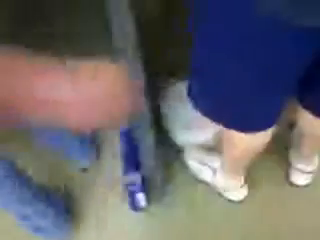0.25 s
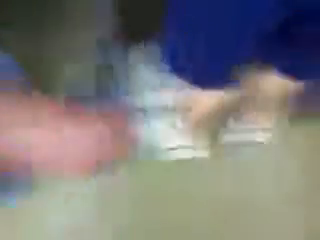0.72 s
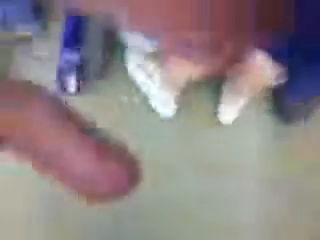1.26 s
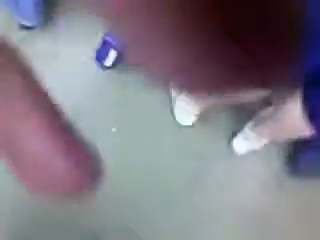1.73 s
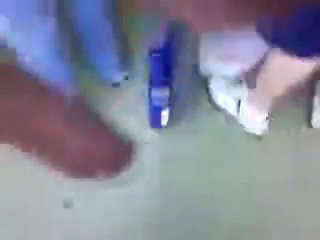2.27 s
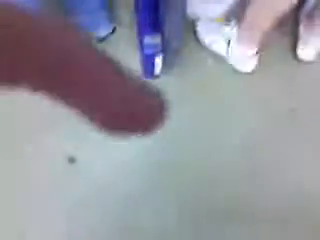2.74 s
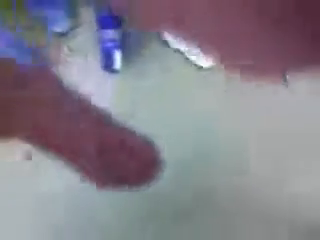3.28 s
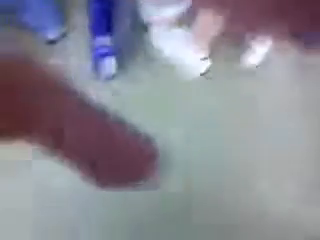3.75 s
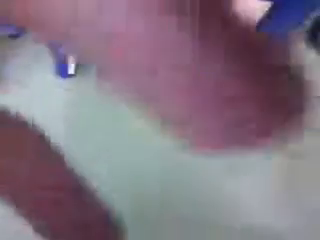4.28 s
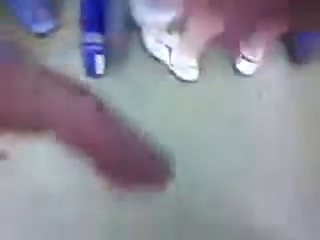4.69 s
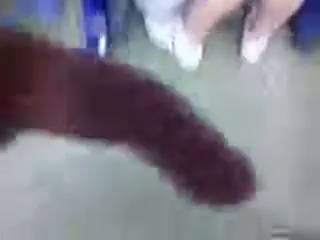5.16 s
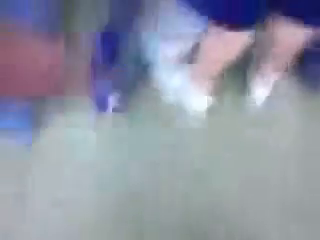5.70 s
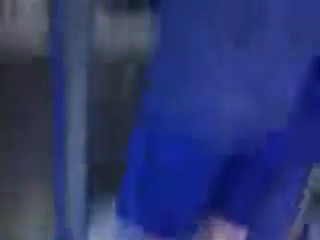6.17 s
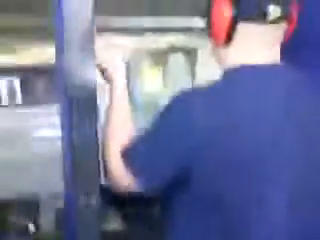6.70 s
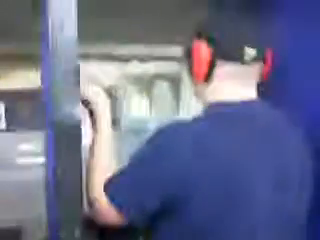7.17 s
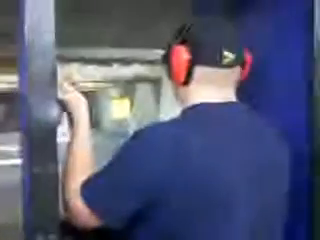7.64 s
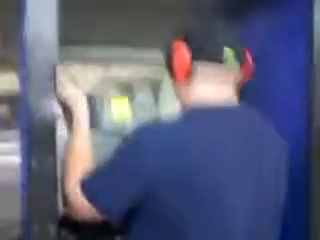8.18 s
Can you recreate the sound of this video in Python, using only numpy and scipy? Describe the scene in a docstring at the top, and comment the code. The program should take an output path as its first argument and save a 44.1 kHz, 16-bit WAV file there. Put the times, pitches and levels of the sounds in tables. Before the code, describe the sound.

Overdriven handgun shots roar and echo between concrete walls, with small metal clicks, a tinkling cartridge case and soft rustling in the gaps.

```python
"""An indoor range, just behind the firing line: five pistol shots through a hand-held stereo recorder.
Each shot is a pressure pulse, a noise burst and a hall echo whose treble dies first; saturation makes it a harsh roar
until the echo has died down enough to come through clean. Between shots: decaying noise for clicks and knocks of
gun handling, a decaying sine for a ringing cartridge case, thin squeaks, shaped noise for rustle near the recorder
and for ventilation, and wavering sines for fan hum."""
import sys
import numpy as np
from scipy import signal
from scipy.fft import rfft, irfft, next_fast_len
from scipy.io import wavfile
from scipy.ndimage import uniform_filter1d

SR = 44100
rng = np.random.default_rng(int(sys.argv[2]) if len(sys.argv) > 2 else 0)


def persist_wave(psi):
    """Save psi, clipped to +-1, as 16-bit WAV."""
    counts = np.round(np.clip(psi, -1, 1) * 32767).astype(np.int16)
    wavfile.write(sys.argv[1], SR, np.atleast_2d(counts).T)


N = 371763
TIME = np.arange(N) / SR
PORT_DELAY = 1 / 2610  # travel time between the microphones, s


def gain_of(db):
    """Level to amplitude: 20 dB is a factor of ten."""
    return 10 ** (np.asarray(db) / 20)


def read(points, hz):
    """Interpolates a table along a logarithmic frequency axis."""
    f, value = np.transpose(points)
    return np.interp(np.log(hz + 1), np.log(f + 1), value)


def add(mix, s, sound):
    """Superposition: adds a two-channel sound to the mix from time s."""
    part = mix[:, round(s * SR):][:, :sound.shape[1]]
    part += sound[:, :part.shape[1]]


def wander(size, rate_hz):
    """Low-passed noise: smooth random motion of standard deviation 1."""
    hz = np.fft.rfftfreq(size, 1 / SR)
    x = irfft(rfft(rng.standard_normal(size)) / (1 + (hz / rate_hz) ** 4), size)
    return x / x.std()


def swell(top_s, rise_s, fall_s):
    """Squared-cosine envelope: a smooth rise from 0 to 1 and back."""
    u = (TIME - top_s) / np.where(TIME < top_s, rise_s, fall_s)
    return np.cos(np.pi / 2 * np.clip(u, -1, 1)) ** 2


def diffuse(spectrum, size, tilt_db=0, likeness=0.99):
    """Diffuse-field coherence: two microphones agree in the bass, not at wavelengths below their spacing."""
    padded = next_fast_len(size)
    hz = np.fft.rfftfreq(padded, 1 / SR)
    a, b = rfft(rng.standard_normal((2, padded)))
    same = likeness * np.sinc(2 * hz * PORT_DELAY)
    common = a * np.sqrt((1 + same) / 2)
    apart = b * np.sqrt((1 - same) / 2)
    # tilt_db is per octave, pivoting near 1 kHz
    colour = gain_of(read(spectrum, hz) + tilt_db * np.log2((hz + 20) / 1000))
    pair = np.array([common + apart, common - apart]) * colour
    return irfft(pair, padded)[:, :size] * np.sqrt(SR / 2)  # noise density per Hz to amplitude


def burst(spectrum, db, t60, tilt_db=0):
    """Exponential decay: a sudden cloud of reflections that loses 60 dB in t60 seconds."""
    return diffuse(spectrum, SR, tilt_db) * gain_of(db - 60 * TIME[:SR] / t60)


def shots(clump_db=0.5, clump_hz=45, mode_spread=0.095):
    """Impulsive source in a room: pressure front, bright blast, then reverberation arriving in clumps."""
    # one row a shot: t/s, hall echo level/dB, blast level/dB, blast t60/s, brightness/(dB per octave),
    # factor on the hall's decay time
    shot_rows = [(0.1160, 3.5, 10, 0.4, -0.11, 1.058), (2.0672, -1, 1, 0.37, -0.25, 1),
                 (4.818, 0, 1.5, 0.36, -0.06, 1.01), (5.2650, 4.5, 13.5, 0.33, 0.03, 0.95),
                 (6.8850, -1.5, 0, 0.37, 0.22, 1.044)]
    # first reflections from booth, floor and ceiling, at a blast level of 0 dB: f/Hz, level/(dB per Hz)
    blast_spectrum = [(40, -62.5), (120, -38.5), (350, -29), (1000, -29.5), (2000, -19), (4000, -25.5),
                      (7000, -23.5), (10000, -26), (14000, -25.5)]
    out = np.zeros((2, N))
    # some of the hall's modes outlast their neighbours, the same ones after every shot
    lasting = np.exp(mode_spread * uniform_filter1d(rng.standard_normal(1025), size=2))
    for s, hall_db, blast_db, blast_t60, tilt_db, stretch in shot_rows:
        blast = burst(blast_spectrum, blast_db, blast_t60, tilt_db)
        add(out, s, gain_of(blast_db) * front() + blast)
        add(out, s, hall(hall_db, tilt_db, stretch * lasting))
    return out * gain_of(clump_db * wander(N, clump_hz))


def front(peak_db=21, push_s=.0014):
    """Zero net impulse: a push, then a longer suck, throws the two overdriven microphones opposite ways."""
    # peak_db holds at a blast level of 0 dB
    u = TIME[:SR] / push_s
    return gain_of(peak_db) * (1 - u) * np.exp(-u) * np.array([[-1], [1]])


def hall(db, tilt_db, stretch, size=3 * SR):
    """Frequency-dependent reverberation: the long echo between concrete walls loses its treble first."""
    # the echo at the shot, for an echo level of 0 dB: f/Hz, level/(dB per Hz)
    hall_spectrum = [(40, -69), (110, -50.5), (170, -49), (250, -38.5), (350, -32.5), (500, -35),
                     (750, -37), (1000, -38), (1500, -36), (2200, -32.5), (3500, -36), (7000, -45),
                     (13000, -38.5)]
    # decay time before the stretch factor: f/Hz, t60/s
    hall_decay = [(100, 1.8), (350, 1.618), (1000, 1.379), (2000, 0.97), (3500, 0.77), (7000, 0.76),
                  (13000, 0.33)]
    hz, t, z = signal.stft(diffuse(hall_spectrum, size, tilt_db), SR, nperseg=2048)
    t60 = stretch * read(hall_decay, hz)
    fade = gain_of(db - 60 * t / t60[:, None])
    return signal.istft(z * fade, SR, nperseg=2048)[1][:, :size]


def handling(snap_db=5, snap_t60=0.015):
    """Impact noise: each click or knock is a short snap over a decaying cloud of reflections."""
    # small metal clicks of guns and cases: t/s, level/dB over the spectrum, t60/s, brightness/(dB per octave)
    click_rows = [(.4875, 37, .03, -4), (.5335, 20.5, .03, -1.5), (1.0387, -2.5, 0.28, 1.5),
                  (1.0916, 1, 0.29, .5), (1.1978, 3.5, 0.27, -2), (1.5136, -6, 0.21, -3.5),
                  (2.7951, -1, 0.28, -1), (3.3488, -10, .13, -1.5), (3.4271, 3.5, .02, -2),
                  (3.4338, 3, .07, 0)]
    # click spectrum: f/Hz, level/(dB per Hz)
    click_spectrum = [(40, -140), (300, -107), (1500, -83), (4000, -84.5), (8000, -83), (14000, -89.5)]
    # dull knocks at the bench: t/s, level/dB over the spectrum, t60/s, brightness/(dB per octave)
    knock_rows = [(4.7475, -4, 0.46, 3), (6.7323, -2.5, 0.051, -5.2)]
    # knock spectrum: f/Hz, level/(dB per Hz)
    knock_spectrum = [(100, -84), (500, -85), (1600, -69), (3500, -73), (7000, -95.5), (14000, -101)]
    out = np.zeros((2, N))
    for rows, spectrum in (click_rows, click_spectrum), (knock_rows, knock_spectrum):
        for s, db, t60, tilt_db in rows:
            reflections = burst(spectrum, db, t60, tilt_db)
            snap = burst(spectrum, db + snap_db, snap_t60, tilt_db)
            add(out, s, reflections + snap)
    return out


def case(mode_hz=10590, t60=0.25, smear_turns=0.16, smear_hz=70):
    """Modal ringing: a brass case sounds one mode; reflections smear its phase apart at each microphone."""
    # bounces on concrete: t/s, level/dB
    bounces = [(4.063, -36.5), (4.088, -38), (4.18, -54), (4.25, -58), (4.33, -55), (4.385, -62),
               (4.53, -58.5)]
    out, t = np.zeros((2, N)), TIME[:SR]
    for s, db in bounces:
        smear = smear_turns * np.array([wander(SR, smear_hz), wander(SR, smear_hz)])
        turns = mode_hz * t + rng.random((2, 1)) + smear
        add(out, s, gain_of(db - 60 * t / t60) * np.sin(2 * np.pi * turns))
    return out


def squeaks(waver=0.0035, waver_hz=90, lag_turns=0.35):
    """Frequency modulation: a thin, unsteady high tone, out of phase between the microphones."""
    # t/s, length/s, mean f/Hz, level/dB
    squeak_rows = [(6.243, 0.054, 8070, -39), (6.533, 0.48, 8100, -50.5)]
    out = np.zeros((2, N))
    for s, length, hz, db in squeak_rows:
        size = round(length * SR)
        unsteady_hz = hz * (1 + waver * wander(size, waver_hz))
        turns = np.cumsum(unsteady_hz) / SR + np.array([[0], [lag_turns]])
        envelope = signal.windows.hann(size) ** .5
        add(out, s, gain_of(db) * np.sin(2 * np.pi * turns) * envelope)
    return out


def rustle(rise_share=0.59, floor_db=-71, grip_db=1.5, grip_hz=18):
    """Friction noise: a stroke hisses louder as it speeds up, fades as it slows; uneven grip makes it flicker."""
    # strokes of cloth and hand near the recorder: t of the top/s, length/s, level/dB over the spectrum
    strokes = [(0.072, .4, -60), (1.6, 0.14, -59.5), (1.85, 0.33, -64), (2.002, 0.18, -65),
               (3.52, 0.35, -58), (3.93, 1, -60), (4.137, 0.34, -52), (4.57, 1, -57.5), (6.247, 0.99, -63),
               (6.762, 0.86, -55.5), (7.826, 0.88, -56), (8.365, 0.92, -55)]
    # spectrum at a level of 0 dB: f/Hz, level/(dB per Hz)
    rustle_spectrum = [(500, -62.5), (2000, -46.5), (4000, -36), (7000, -35.5), (10000, -38.5),
                       (14000, -38.5)]
    power = gain_of(floor_db) ** 2  # the faint constant hiss beneath the strokes
    for s, length, db in strokes:
        stroke = swell(s, rise_share * length, (1 - rise_share) * length)
        power = power + (gain_of(db) * stroke) ** 2
    return diffuse(rustle_spectrum, N) * np.sqrt(power) * gain_of(grip_db * wander(N, grip_hz))


def ventilation(sway_db=1.93, sway_hz=8):
    """Broadband flow noise: the rush of the air extraction sways a little and swells once."""
    # usual spectrum: f/Hz, level/(dB per Hz)
    vent_spectrum = [(25, -100), (70, -89.5), (110, -86), (170, -77), (280, -80.5), (480, -83), (720, -91),
                     (1000, -90.5), (1600, -85.5), (2200, -90), (3700, -96.5), (5500, -103), (14000, -114)]
    # the one swell: t of the top/s, rise/s, fall/s, level/dB above the usual
    vent_swell = (6.1, 4, 1.5, 3.7)
    top_s, rise_s, fall_s, db = vent_swell
    level_db = db * swell(top_s, rise_s, fall_s) + sway_db * wander(N, sway_hz)
    return diffuse(vent_spectrum, N) * gain_of(level_db)


def fans(waver_turns=0.066, waver_hz=2):
    """Phase modulation: faint wavering tones in the ventilation."""
    # hum of the fans: f/Hz, level/dB
    hum_tones = [(181, -58.5), (361, -61.5), (468, -62.5), (549, -65), (1028, -71), (1660, -75)]
    total = 0
    for hz, db in hum_tones:
        turns = hz * TIME + waver_turns * wander(N, waver_hz)
        total = total + gain_of(db) * np.sin(2 * np.pi * turns)
    return total


def scene():
    """Superposition of all sources: the pressure at the two microphones."""
    return shots() + handling() + case() + squeaks() + rustle() + ventilation() + fans()


def overload(x, ceiling_db=-8.5, knee=6, onset_db=-13, flutter_growth=0.58, choke=0.011):
    """Saturation: each overdriven microphone flutters with a wide low roar; the hardest blasts choke it."""
    # flutter of the overdriven resting point, at an excess of 1: f/Hz, level/(dB per Hz)
    flutter_spectrum = [(25, -41.5), (70, -44.5), (140, -35), (300, -34), (450, -34.5), (800, -49),
                        (2000, -64), (14000, -104)]
    over = np.maximum(abs(x) - gain_of(onset_db), 0)
    # mean overdrive during the last 9 ms; abs guards against rounding below zero
    excess = abs(uniform_filter1d(over, size=400, axis=1, origin=199))
    flutter = excess ** flutter_growth * diffuse(flutter_spectrum, N, likeness=0)
    driven = x + flutter
    clipped = driven / (1 + abs(driven / gain_of(ceiling_db)) ** knee) ** (1 / knee)
    return clipped / (1 + choke * excess)


def gain_control(x, depth=2.9, recover_s=0.61):
    """Feed-forward compression: gain sags under each roar and is still down at a quick second shot."""
    keep = np.exp(-1 / (recover_s * SR))
    power = signal.lfilter([1 - keep], [1, -keep], (x ** 2).mean(0))
    return x / (1 + depth * power)


def record(dry, edge_hz=13990):
    """Delay-and-subtract: each channel loses the delayed other one, which widens and combs the sound."""
    # share of the opposite microphone subtracted, in bass, middle and treble: f/Hz, share
    cross_bass = [(40, 1), (300, 0.95)]
    cross_middle = [(1200, .997), (4050, .997)]
    cross_treble = [(4900, 0.33), (8000, 0.18), (14000, .3)]
    # the recorder's tone: f/Hz, level/dB
    tone_curve = [(20, -12), (43, -1), (90, 4), (130, 6), (250, 5), (600, 4.5), (1000, 4), (1700, -0.77),
                  (2400, -2.7), (3700, -2), (5000, -5), (9000, 0.3), (14000, -2)]
    size = next_fast_len(N + SR)
    hz = np.fft.rfftfreq(size, 1 / SR)
    ports = rfft(gain_control(overload(dry)), size)
    share = np.clip(read(cross_bass + cross_middle + cross_treble, hz), 0, 1)
    cross = share * np.exp(-2j * np.pi * hz * PORT_DELAY)
    widened = (ports - cross * ports[::-1]) * gain_of(read(tone_curve, hz))
    wide = irfft(widened, size)[:, :N]
    low_pass = signal.firwin(511, edge_hz, window=("kaiser", 8), fs=SR)
    return signal.oaconvolve(np.clip(wide, -1, 1), low_pass[None], "same", axes=1)


dry = scene()
out = record(dry)
persist_wave(out)
```